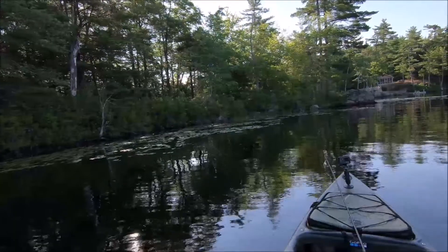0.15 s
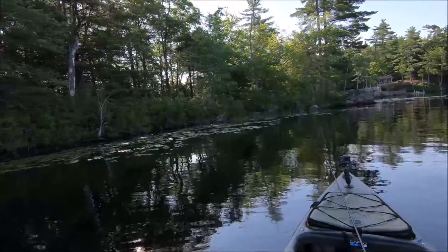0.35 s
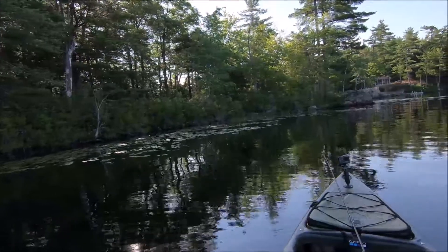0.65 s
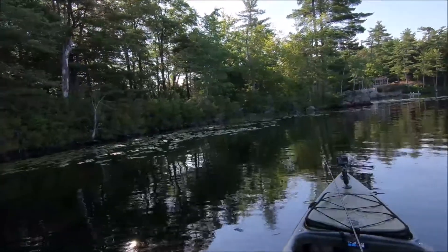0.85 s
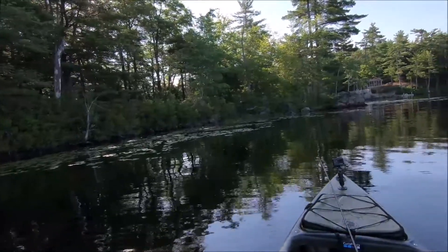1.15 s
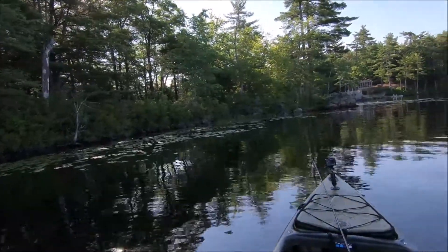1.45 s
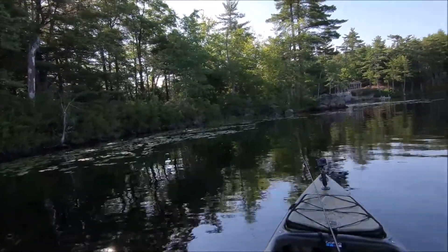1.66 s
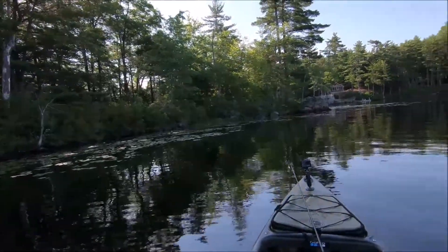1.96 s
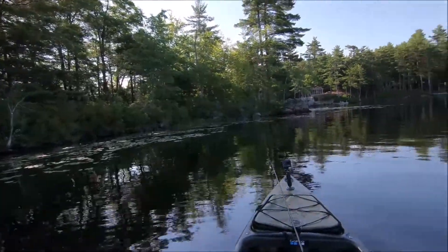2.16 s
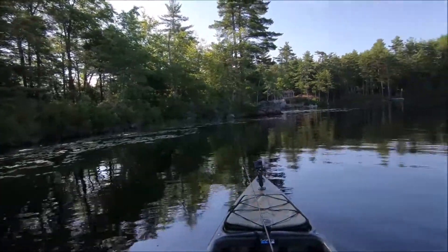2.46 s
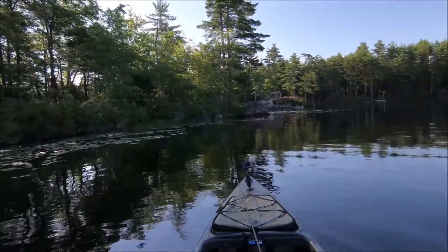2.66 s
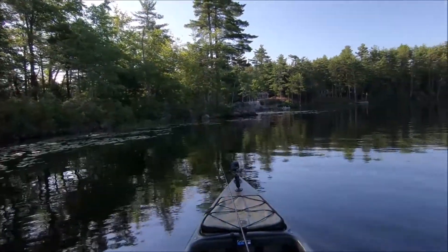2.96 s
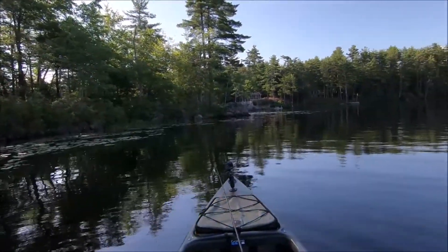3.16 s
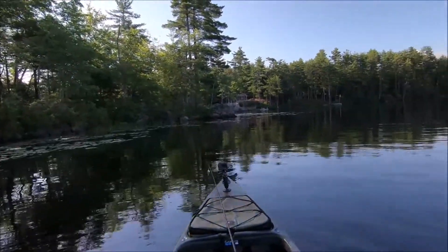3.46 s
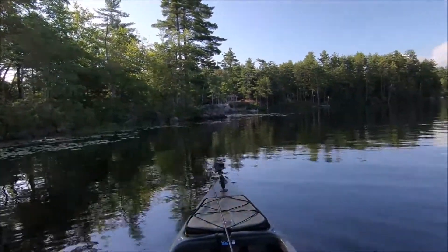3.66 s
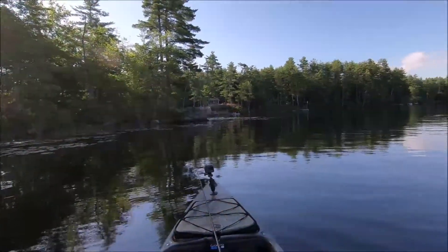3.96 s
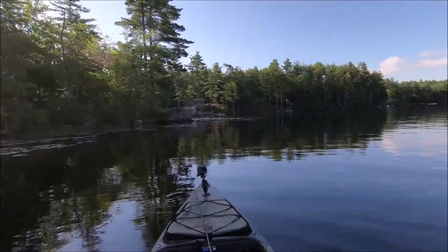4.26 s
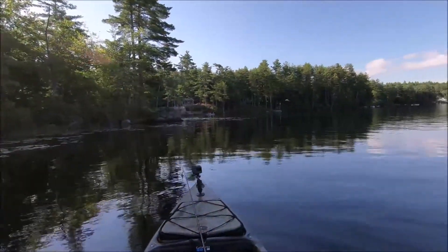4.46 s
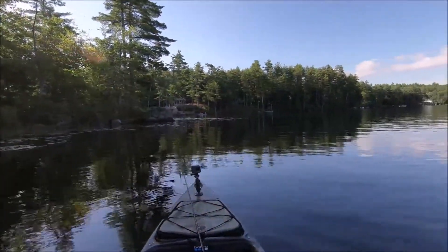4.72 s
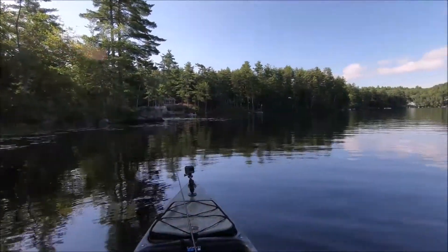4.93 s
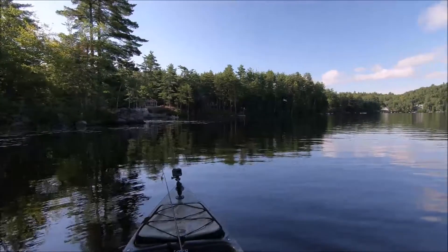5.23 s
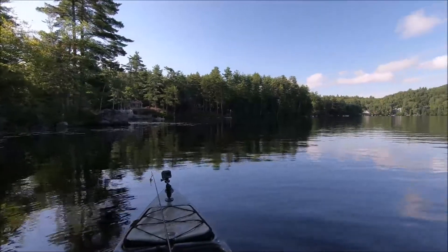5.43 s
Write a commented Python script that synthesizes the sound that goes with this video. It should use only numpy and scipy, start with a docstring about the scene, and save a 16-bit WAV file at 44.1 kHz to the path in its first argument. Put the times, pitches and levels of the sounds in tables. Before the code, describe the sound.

Outdoors on a calm, tree-lined lake, a loon gives a rapid quavering tremolo in the first half second, echoed by the shore, while soft wind puffs thump on the microphone. A faint far hoot follows. After a quiet stretch of hush and light rustle, a paddle taps close by near 3.6 seconds, stirs the water and sheds a flurry of plinking drops, thinning to a few late drips.

```python
"""Loon and paddle on a calm lake

A loon gives a quavering tremolo, its overtones swept through the throat, and the wooded shore throws it back;
a far hoot, a gliding tone, follows. Puffs of wind thump on the microphone of a kayak as damped-out swings.
Later a paddle knocks, stirs up froth and sheds drops, each trapping a small ringing bubble,
over a faint hush and rustle of filtered noise.
"""
import sys
import numpy as np
from scipy import signal
from scipy.fft import rfft, irfft
from scipy.io import wavfile
from scipy.ndimage import uniform_filter1d, map_coordinates

SR = 44100
rng = np.random.default_rng(int(sys.argv[2]) if len(sys.argv) > 2 else 0)


def output_pcm(signal):
    """Save a mono or channel-first signal as 16-bit PCM at the path in sys.argv[1].

    Samples are clipped to [-1, 1] before scaling.
    """
    pcm = np.clip(np.atleast_2d(signal).T, -1, 1) * 32767
    wavfile.write(sys.argv[1], SR, np.round(pcm).astype(np.int16))


N = 246519
T = np.arange(N) / SR  # [s]
LN_60DB = np.log(1000)  # decay exponent over one t60
EDGE_HZ = 15000  # upper band limit

# Low hush over the lake: (frequency [Hz], level [dB])
HUSH_SPECTRUM = [(15, -47), (25, -12.5), (57, -16), (118, -15), (134, -5.5), (154, 0), (222, -3.5),
                 (260, -14.5), (400, -33.5), (1000, -74.5)]
# Murmur of the far forest: (frequency [Hz], level [dB])
MURMUR_SPECTRUM = [(150, -32.5), (280, -8), (381, -5.5), (575, -13.5), (764, 1.5), (924, -6.5),
                   (1100, -22.5), (1430, -35.5), (2420, -110)]
# Thin airy hiss: (frequency [Hz], level [dB])
AIR_SPECTRUM = [(700, -27.5), (1100, 7.5), (1500, 2), (2100, -8), (2800, -6), (3700, 4.5), (4600, -5),
                (6200, -9.5), (8000, -13.5), (11000, -20.5), (14500, -28)]
# Likeness of the hiss in the two channels: (frequency [Hz], correlation [0-1])
AIR_LIKENESS = [(100, 1), (5000, 1), (8000, .96), (12000, .75), (15000, .6)]
HUSH_DB, MURMUR_DB, AIR_DB = -64, -68, -72.5  # rms before slow level changes

# Rustle close by: (frequency [Hz], level [dB])
RUSTLE_SPECTRUM = [(600, -17), (1500, -13), (2500, -10.5), (3200, -1), (3700, 4.5), (4700, -6.5),
                   (6000, -6.5), (6800, -13.5), (7800, -23), (10000, -40.5), (14000, -56)]
# Brief swishes of the rustle: (peak time [s], rise [s], decay [s], level [dB])
RUSTLE_SWISHES = [(0.709, 0.063, 0.036, -63), (0.964, 0.025, 0.055, -65.5), (1.259, 0.02, 0.2, -64.5),
                  (1.599, 0.21, 0.21, -65), (2.341, 0.026, 0.052, -72), (2.86, 0.026, 0.04, -78),
                  (3.28, 0.29, 1, -70.5), (4.93, 0.57, 0.21, -67.5), (5.142, 0.036, 0.016, -61.5),
                  (5.52, 0.084, 0.057, -67)]
# Light ticks in the rustle: (time [s], level [dB])
RUSTLE_TICKS = [(2.321, -66), (2.372, -65), (3.118, -56), (3.163, -58), (3.211, -60.5), (3.286, -59.5),
                (3.3213, -59), (3.399, -65), (3.493, -58)]
RUSTLE_REST_DB = -79.5  # between swishes

# Wind on the microphone: (time [s], level [dB], length [s], buffeting pitch [Hz])
WIND_PUFFS = [(0.061, -37.5, 0.094, 55.7), (0.084, -18.5, 0.0043, 72), (0.182, -35.5, 0.04, 70.9),
              (0.224, -32.5, 0.036, 37.2), (0.373, -44.5, 0.0076, 148), (0.399, -41, 0.013, 61.5),
              (0.554, -30, 0.016, 51.6), (0.787, -43.5, 0.018, 55.7), (0.824, -39, 0.0095, 141.8),
              (0.836, -45.5, 0.046, 39.1), (2.748, -60, 0.029, 47.1)]

# Large bubbles stirred by the blade: (frequency [Hz], level [dB])
SLOSH_SPECTRUM = [(100, -18), (300, 20.5), (650, -1.5), (1000, -0.5), (1700, 5), (2500, -1), (3500, 10),
                  (7000, -41)]
# Tiny bubbles: (frequency [Hz], level [dB])
FIZZ_SPECTRUM = [(1200, -22), (2600, -3.5), (3700, 3.5), (5000, -2.5), (6400, -2), (7800, -15),
                 (10000, -18), (14500, -43)]
# Splashes of the blade: (peak time [s], decay [s], slosh level [dB], fizz level [dB])
BLADE_SPLASHES = [(3.66, 0.025, -63, -53.5), (3.71, 0.018, -53, -65), (3.794, 0.028, -59, -77),
                  (3.838, 0.015, -55, -62), (3.967, 0.36, -70, -60), (4.137, 0.095, -63, -48.5),
                  (4.172, 0.02, -55, -47), (4.223, 0.016, -59, -50), (4.294, 0.024, -57, -66),
                  (4.367, 0.057, -60, -57.5), (4.54, 0.028, -66, -53), (4.565, 0.021, -57.5, -64),
                  (4.66, 0.026, -64, -70)]
# The blade is in the water, keeping up a low wash: (start [s], end [s])
STROKE_SPAN = (3.63, 4.46)
WASH_SLOSH_DB, WASH_FIZZ_DB = -67, -72
SPLASH_RISE_S = 0.004

# Partials of the paddle knock: (frequency [Hz], level relative to KNOCK_DB [dB], t60 [s])
KNOCK_PARTIALS = [(500, -10, 0.044), (1000, -12, 0.013), (1280, 7, 0.0045), (1950, 8, 0.0035),
                  (3340, -0.5, 0.014)]
KNOCK_S, KNOCK_DB, KNOCK_RISE_S = 3.6408, -39, 0.0004

# Drops, each trapping a bubble: (time [s], peak level [dB], nominal bubble pitch [Hz], decay [ms])
WATER_DROPS = [(3.6604, -40, 4600, 0.84), (3.7218, -45.5, 3720, 2.4), (3.784, -48.5, 1460, 7),
               (3.794, -39, 1630, 4.6), (3.8104, -37, 1287, 5.4), (3.81, -41.5, 3720, 2.3),
               (3.8176, -36.5, 3480, 2), (3.8415, -50, 4480, 1.6), (3.87, -42.5, 3740, 1.6),
               (3.912, -29, 3210, 2.6), (3.92, -49, 4940, 1.8), (3.928, -52.5, 1180, 8),
               (3.9293, -31.5, 3080, 1.1), (3.9667, -36, 3000, 0.31), (4.0265, -42, 2500, 1.1),
               (4.0707, -33.5, 3480, 1.5), (4.0766, -25, 2910, 1.33), (4.1027, -39.5, 2660, 3),
               (4.122, -45, 1000, 5.5), (4.134, -24, 3320, 2), (4.1378, -39, 3360, 2.2),
               (4.163, -43, 1910, 3.6), (4.1702, -27, 2610, 2.3), (4.174, -38.5, 3020, 5.4),
               (4.182, -41, 1645, 4.5), (4.1898, -46, 2480, 1.6), (4.1963, -36.5, 4230, 0.7),
               (4.22, -29.5, 3780, 1.5), (4.248, -37.5, 3360, 2.5), (4.2633, -40.5, 4830, 0.73),
               (4.288, -42, 990, 1.9), (4.2878, -44, 1820, 1.2), (4.3497, -41, 3090, 3),
               (4.3738, -35.5, 3330, 1.3), (4.4113, -30, 3250, 0.53), (4.4836, -31, 3740, 0.25),
               (4.49, -37, 6900, 0.32), (4.5353, -51, 3460, 2.3), (4.557, -49, 1650, 5.3),
               (4.575, -52, 1635, 5.2), (4.587, -45, 4530, 1.8), (4.683, -47.5, 4260, 2),
               (4.897, -45, 5270, 1.3), (4.927, -50.5, 3250, 1.6), (4.9593, -51, 3580, 2.5),
               (4.9997, -29, 3335, 2.1), (5.02, -29.5, 3550, 0.83), (5.055, -54.5, 5500, 1.5),
               (5.1614, -52, 3950, 1.8), (5.348, -53, 4970, 0.32)]
GENTLE_DB, HARD_DB = -49, -30  # from a steady ping to a chirping plink
SINK, SINK_MS = .2, 2.8  # slow pitch fall of a sinking bubble at full force: share of pitch, time constant
# One drop's crack on the hull and its spray: (frequency [Hz], level [dB])
SNAP_SPECTRUM = [(2500, -21), (6000, 12), (8500, -18), (14500, -27)]
SNAP_S, SNAP_DB, SPRAY_DB, SPRAY_S = 4.22, -35.5, -68, 0.025
# A large bubble rising to the surface: (time [s], pitch [Hz], level [dB])
RISING_BUBBLE = [(4.795, 785, -58), (4.812, 843, -60.5), (4.823, 1140, -57.5), (4.832, 1600, -54),
                 (4.842, 2020, -77)]
# Dulling of the drops, knock and rising bubble: (frequency [Hz], gain [dB])
WATER_DULLING = [(6500, 0), (7700, -14.5), (10000, -17.5), (14000, -37)]

# Single echoes off the shore: (delay [s], level [dB])
SHORE_ECHOES = [(0.036, -17.5), (0.079, -12.5), (0.171, -25.5), (0.214, -21), (0.268, -30), (0.93, -34.5)]
# How long the far trees ring: (frequency [Hz], t60 [s])
FAR_TREE_DECAY = [(500, 8.7), (1200, 3.45), (2400, 4.6), (4000, 2.1), (7000, .6)]
# How well the shore returns the loon: (frequency [Hz], gain [dB])
SHORE_RETURN = [(1130, 4), (1220, -1.5), (1290, -2), (2400, -5.5), (3450, -9), (3850, -2), (4600, 1),
                (5600, -1.5)]
NEAR_T60_S = 0.6  # scatter from the near trees
RIPPLE_DB, RIPPLE_HZ = 1.6, 12  # wavering of the echoes: rms depth, rate limit
# Detours off the water and near bank that make the overtones beat: (delay [s], level [dB])
SKIM_PATHS = [(0.0034, -11), (0.0083, -12.5), (0.0185, -12.5)]

# The far hoot: (time [s], pitch [Hz], fundamental level [dB])
HOOT_GLIDE = [(.895, 710, -68), (.915, 749, -61.5), (.945, 778, -59), (.975, 777, -73), (.99, 732, -87)]

# Warbles of the tremolo, each lasting until the next: (start [s], starting pitch [Hz], top pitch [Hz],
# top fundamental [dB], top third harmonic [dB], top fifth and sixth harmonics [dB]);
# the harmonic levels are before the throat and third-harmonic weighting
LOON_WARBLES = [(0.004, 1156, 1129, -46.5, -65, -86), (0.043, 1089, 1256, -39.5, -55.5, -72),
                (0.122, 1058, 1235, -38, -51, -74.5), (0.203, 1073, 1282, -29.5, -55, -63),
                (0.288, 1101, 1281, -29, -53.5, -62.5), (0.369, 1084, 1256, -33.5, -60.5, -64),
                (0.458, 1099, 1266, -31.5, -61, -65.5), (0.541, 1069, 1144, -48.5, -54, -63)]
# Throat weighting of the second, fourth, fifth and sixth harmonics: (frequency [Hz], gain [dB])
THROAT_GAIN = [(2120, -4), (2250, -5.5), (2400, -5), (2560, -3), (4200, -2.5), (4400, 4.5), (4620, 3),
               (4850, 4), (5020, -11), (5150, -19), (5400, -5), (5750, -2), (6100, 3), (6400, -8),
               (6680, -28), (6830, -3.5), (6950, -29)]
# Weighting of the third harmonic: (frequency [Hz], gain [dB])
THIRD_GAIN = [(3230, -1.5), (3400, 4), (3520, 1), (3680, 8.5), (3770, 5.5), (3840, -10)]
CALL_END_S, END_HZ, END_FADE_S = 0.62, 1062, 0.0062  # the pitch drops to END_HZ as the voice dies away
ARCH_SKEW, ARCH_FLAT = 0.91, 0.89  # pitch arches rise faster than they fall, with flattened tops
LOUD_FLAT = 1.66  # the fundamental swells in flat-topped, steep-sided pulses
TURN_S = 0.0023  # time the voice takes to turn round
DIP_DB, DIP_THIRD_DB, DIP_FIFTH_DB = -48.5, -68.5, -66.5  # levels between warbles
EVEN_DB = -59.5  # second and fourth harmonics before the throat, the same throughout
# Unsteadiness (rms) of the pitch [share], third harmonic [dB] and other overtones [dB]
JITTER, SHIMMER_DB, FLUTTER_DB = 0.0026, 1.3, 2.8


def amp(db):
    """Decibels to gain."""
    return 10 ** (np.asarray(db) / 20)


def unit(x):
    """Scales to rms 1."""
    return x / np.sqrt(np.mean(x ** 2) + 1e-20)


def noise(count=N):
    """White noise."""
    return rng.standard_normal(count)


def read(points, hz):
    """Reads a spectrum on a log-frequency axis."""
    f, value = np.transpose(points)
    return np.interp(np.log(hz + 1), np.log(f + 1), value)


def add(mix, s, sound):
    """Mixes a sound in at a time."""
    part = mix[max(round(s * SR), 0):][:len(sound)]
    part += sound[:len(part)]


def shade(x, spectrum):
    """Filters by a spectrum."""
    return irfft(rfft(x) * amp(read(spectrum, np.fft.rfftfreq(N, 1 / SR))), N)


def colour(x, spectrum):
    """Filters by a spectrum, to rms 1."""
    return unit(shade(x, spectrum))


def wander(rate_hz):
    """Random drift of rms 1, slower than about the given rate."""
    hz = np.fft.rfftfreq(N, 1 / SR)
    return unit(irfft(rfft(noise()) / (1 + (hz / rate_hz) ** 4), N))


def glide(s, values):
    """Smooth spline through the points of a curve."""
    return map_coordinates(values, [np.interp(T, s, np.arange(len(s)))], order=3, mode="nearest")


def during(s, fade=0.00021):
    """One between the first and last time, with soft edges."""
    return np.clip((T - s[0]) / fade, 0, 1) * np.clip((s[-1] - T) / fade + 1, 0, 1)


def swell(s, rise_s, decay_s):
    """A soft rise to a peak of one, then an exponential decay."""
    return np.exp(-(np.minimum(T - s, 0) / rise_s) ** 2 - np.maximum(T - s, 0) / decay_s)


def whistle(rows, overtones_db, jitter=0):
    """A gliding tone with a few overtones, made slightly unsteady by any jitter."""
    s, hz, db = np.transpose(rows)
    phase = 2 * np.pi * np.cumsum(glide(s, hz) * (1 + jitter * wander(120))) / SR
    tone = np.sin(phase)
    for k, level in enumerate(overtones_db, 2):
        tone += amp(level) * np.sin(k * phase)
    return np.sqrt(2) * during(s) * amp(np.interp(T, s, db)) * tone


def hush(waver_db=3.0, late_db=-4.0, murmur_late_db=-5):
    """A wavering low hush, far forest murmur and airy hiss that widens at the top; all soften late on."""
    late = np.interp(T, [4.8, 5.4], [0, 1])
    low = amp(HUSH_DB + waver_db * wander(9)) * colour(noise(), HUSH_SPECTRUM)
    murmur = amp(MURMUR_DB + murmur_late_db * late) * colour(noise(), MURMUR_SPECTRUM)
    mid, side = (amp(AIR_DB) * colour(noise(), AIR_SPECTRUM) for _ in range(2))
    same = np.clip(read(AIR_LIKENESS, np.fft.rfftfreq(N, 1 / SR)), 0, 1)
    # side level that gives the wanted correlation between channels
    side = irfft(rfft(side) * np.sqrt((1 - same) / (1 + same)), N)
    return murmur + (low + mid + np.array([side, -side])) * amp(late_db * late)


def rustle(grains_per_s=500, grain_share=0.86, tick_s=0.0033):
    """A soft, slightly grainy hiss that swells and fades close by, with a few light ticks."""
    grains = unit(noise() * (rng.random(N) < grains_per_s / SR))
    hiss = colour(noise() + grain_share * grains, RUSTLE_SPECTRUM)
    power = amp(RUSTLE_REST_DB) ** 2
    for s, rise_s, decay_s, db in RUSTLE_SWISHES:
        power = power + (amp(db) * swell(s, rise_s, decay_s)) ** 2
    ticks = sum(amp(db) * swell(s, tick_s / 10, tick_s) for s, db in RUSTLE_TICKS)
    return np.sqrt(power) * hiss + ticks * colour(noise(), RUSTLE_SPECTRUM)


def wind(rumble_db=-12):
    """Each eddy shoves the diaphragm to and fro and leaves some turbulence."""
    push, strength = np.zeros(N), np.zeros(N)
    for s, db, length, hz in WIND_PUFFS:
        shape = amp(db) * np.exp(-((T - s) / length) ** 2)
        push -= shape * np.cos(2 * np.pi * hz * (T - s))
        strength += shape
    spectrum = [(15, -4.5), (35, -11.5), (70, 5.5), (150, -2.0), (230, -23.5), (350, -37),
                (900, -71.5), (3000, -100)]  # (frequency [Hz], level [dB])
    return push + amp(rumble_db) * strength * colour(noise(), spectrum)


def bubble(hz, decay_ms, force, rise_ms=0.14, sag=0.56, tick_db=-27.0):
    """A drop ticks and its bubble rings; more force (0-1) starts it quicker and steepens the pitch fall."""
    ms = np.arange(SR // 30) * 1000 / SR
    shape = np.exp(-ms / decay_ms) * (1 - np.exp(-ms * force / rise_ms))
    bend = force * (sag * np.exp(-ms / 0.18) + SINK * (np.exp(-ms / SINK_MS) - .5))
    phase = 2 * np.pi * np.cumsum(hz * (1 + bend)) / SR
    tick = signal.lfilter(*signal.butter(2, [1500, 8000], "band", fs=SR), noise(len(ms)))
    # the shorter the ring, the harder the splat
    splat = amp(tick_db) * np.sqrt(force / decay_ms) * unit(tick) * np.exp(-ms / .5)
    return shape / shape.max() * np.sin(phase) + splat


def froth(low_hz, high_hz, per_s, cycles, spread_db, count=24):
    """A crowd of bubbles at random times and strengths, over a spread of pitches."""
    out = np.zeros(N)
    for hz in np.geomspace(low_hz, high_hz, count):
        strengths = amp(spread_db * np.minimum(rng.exponential(1, N), 3.5))
        births = (rng.random(N) < per_s / count / SR) * strengths
        ring = bubble(hz, 1000 * cycles / hz, rng.uniform(.15, .6))
        out += signal.oaconvolve(births, ring)[:N]
    return unit(out)


def stir():
    """The blade stirs up large bubbles and a fine fizz, most of all at each splash."""
    wash = during(STROKE_SPAN, 0.063)
    slosh_power = (amp(WASH_SLOSH_DB) * wash) ** 2
    fizz_power = (amp(WASH_FIZZ_DB) * wash) ** 2
    for s, decay_s, slosh_db, fizz_db in BLADE_SPLASHES:
        splash = swell(s, SPLASH_RISE_S, decay_s)
        slosh_power += (amp(slosh_db) * splash) ** 2
        fizz_power += (amp(fizz_db) * splash) ** 2
    slosh = colour(froth(609, 2690, 1200, 6.5, 4.2) + .3 * noise(), SLOSH_SPECTRUM)
    fizz = colour(froth(2200, 7000, 2000, 5, 4.6) + .3 * noise(), FIZZ_SPECTRUM)
    return np.sqrt(slosh_power) * slosh + np.sqrt(fizz_power) * fizz


def knock():
    """One light, dead tap of the paddle: a few quickly decaying partials."""
    t, out = np.arange(SR // 10) / SR, np.zeros(N)
    ring = np.zeros(len(t))
    for hz, db, t60 in KNOCK_PARTIALS:
        ring += amp(db) * np.exp(-LN_60DB * t / t60) * np.sin(2 * np.pi * hz * t)
    add(out, KNOCK_S, np.minimum(t / KNOCK_RISE_S, 1) * ring)
    return amp(KNOCK_DB) * out


def drips():
    """Drops fall from the paddle blade, the louder ones landing harder."""
    out = np.zeros(N)
    for s, db, hz, decay_ms in WATER_DROPS:
        force = np.interp(db, [GENTLE_DB, HARD_DB], [.2, 1])
        add(out, s, amp(db) * bubble(hz, decay_ms, force))
    return out


def snap(decay_s=0.00036):
    """A drop smacks on the hull: a very short, bright crack inside a faint spray."""
    crack = amp(SNAP_DB) * swell(SNAP_S, decay_s / 2, decay_s)
    spray = amp(SPRAY_DB) * swell(SNAP_S, SPRAY_S, SPRAY_S)
    return (crack + spray) * colour(noise(), SNAP_SPECTRUM)


def hull(x, scatter_db=-13, t60=0.12):
    """The hull and the water beside it scatter close sounds for a moment."""
    t = np.arange(SR // 10) / SR
    scatter = noise(len(t)) * np.exp(-LN_60DB * t / t60) * (t > .002)
    return x + amp(scatter_db) * signal.fftconvolve(x, unit(scatter) / np.sqrt(len(t)))[:N]


def shore(x, near_db=-17, far_db=-19):
    """Distinct echoes, quick scatter from near trees and a long tail from far ones, all wavering slightly."""
    t = np.arange(2 * SR) / SR
    hz, frame_s, z = signal.stft(noise(len(t)), SR, nperseg=256)
    decay = amp(-60 * frame_s / read(FAR_TREE_DECAY, hz)[:, None])
    far = signal.istft(z * decay, SR, nperseg=256)[1][:len(t)]
    # level the tail by its decay at 1400 Hz, then let it build up
    far *= np.sqrt(2 * LN_60DB / (SR * read(FAR_TREE_DECAY, 1400))) * np.minimum(t / 0.034, 1)
    near = noise(len(t)) * np.exp(-LN_60DB * t / NEAR_T60_S) * np.minimum(t / 0.019, 1)
    response = amp(far_db) * far + amp(near_db) * near / np.linalg.norm(near)
    for delay, db in SHORE_ECHOES:
        add(response, delay, amp([db]))
    return signal.fftconvolve(x, response)[:N] * unit(amp(RIPPLE_DB * wander(RIPPLE_HZ)))


def branches(x, t60=0.56):
    """Sound scatters off the branches along the bank and smears."""
    t = np.arange(SR // 2) / SR
    scatter = noise(len(t)) * np.exp(-LN_60DB * t / t60) * np.minimum(t / 0.0026, 1)
    return signal.fftconvolve(x, scatter / np.linalg.norm(scatter))[:N]


def skim(x):
    """The sound arrives by the straight path and a few slightly longer ones."""
    out = x.copy()
    for delay, db in SKIM_PATHS:
        add(out, delay, amp(db) * x)
    return out


def tremolo():
    """Warbles arch up from dips: (pitch [Hz], fundamental [dB], third [dB], fifth and sixth harmonics [dB])."""
    start, low_hz, top_hz, first_db, third_db, fifth_db = np.transpose(LOON_WARBLES)
    turns = [*start, CALL_END_S]
    place = np.interp(T, turns, np.arange(len(turns)))  # counts warbles, with the fraction done
    warble = np.minimum(place.astype(int), len(start) - 1)
    arch = np.tanh(ARCH_FLAT * np.sin(np.pi * (place % 1) ** ARCH_SKEW)) / np.tanh(ARCH_FLAT)
    pulse = np.tanh(LOUD_FLAT * np.sin(np.pi * place) ** 2) / np.tanh(LOUD_FLAT)
    dip_hz = np.interp(T, turns, [*low_hz, END_HZ])

    def course(dip, top, shape):
        """Rises from the dip to each warble's top, with rounded turns."""
        return uniform_filter1d(dip + (top[warble] - dip) * shape, max(round(TURN_S * SR), 1))

    return (course(dip_hz, top_hz, arch), course(DIP_DB, first_db, pulse),
            course(DIP_THIRD_DB, third_db, arch), course(DIP_FIFTH_DB, fifth_db, arch))


def loon():
    """The pitch swings twelve times a second, sweeping overtones through the throat: (fundamental, overtones)."""
    pitch, first_db, third_db, fifth_db = tremolo()
    hz = pitch * (1 + JITTER * wander(280))
    phase = 2 * np.pi * np.cumsum(hz) / SR
    first = amp(first_db) * np.sin(phase)
    third_level = third_db + read(THIRD_GAIN, 3 * hz) + SHIMMER_DB * wander(70)
    overtones = amp(third_level) * np.sin(3 * phase)
    for k, db in {2: EVEN_DB, 4: EVEN_DB, 5: fifth_db, 6: fifth_db}.items():
        level = db + read(THROAT_GAIN, k * hz) + FLUTTER_DB * wander(45)
        overtones += amp(level) * np.sin(k * phase)
    voice = during([LOON_WARBLES[0][0], CALL_END_S]) * np.clip((CALL_END_S - T) / END_FADE_S, 0, 1)
    return np.sqrt(2) * voice * np.array([first, overtones])


def scene():
    """The birds across the water, a touch to the left; paddle and wind close by; nearly mono."""
    drops = hull(drips() + knock()) + whistle(RISING_BUBBLE, overtones_db=(-24,))
    water = shade(drops, WATER_DULLING) + stir() + snap()
    hoot = whistle(HOOT_GLIDE, overtones_db=(-3, -21), jitter=0.0035)
    first, overtones = loon()
    call = first + skim(overtones) + amp(-11) * branches(overtones)
    echoes = shore(shade(first + overtones, SHORE_RETURN) + hoot + amp(-20.0) * water)
    birds = call + hoot + amp(-10.0) * branches(hoot) + echoes
    return hush() + rustle() + wind() + water + birds * amp([[.3], [-.3]])


def record(dry):
    """Limits the band with a steep low-pass."""
    low_pass = signal.firwin(511, EDGE_HZ, window=("kaiser", 9), fs=SR)
    return signal.oaconvolve(dry, low_pass[None], "same")


dry = scene()
out = record(dry)
output_pcm(out)
```